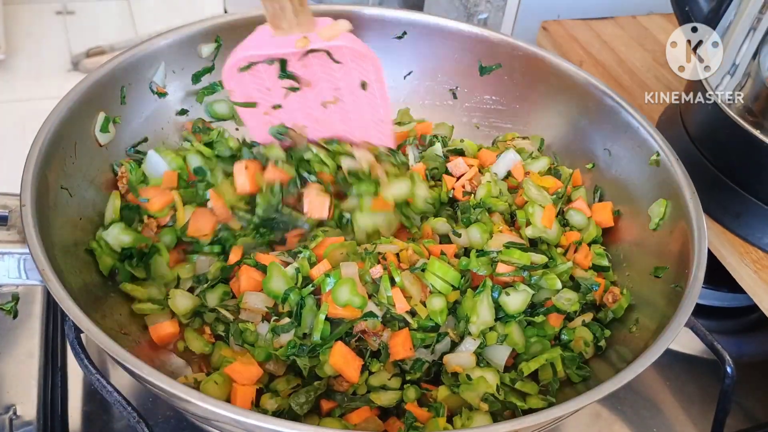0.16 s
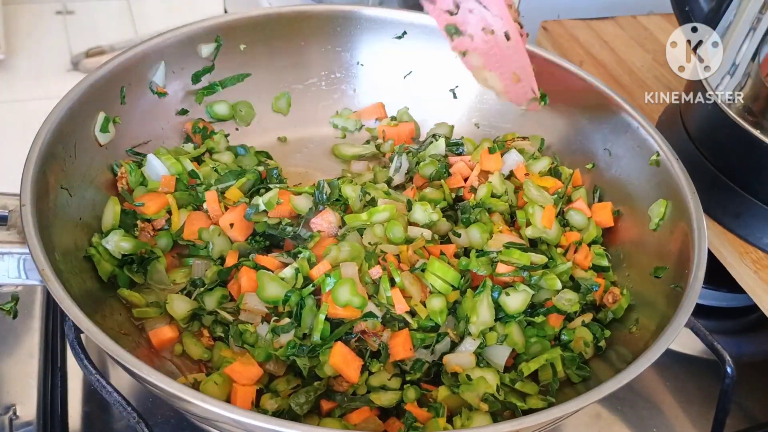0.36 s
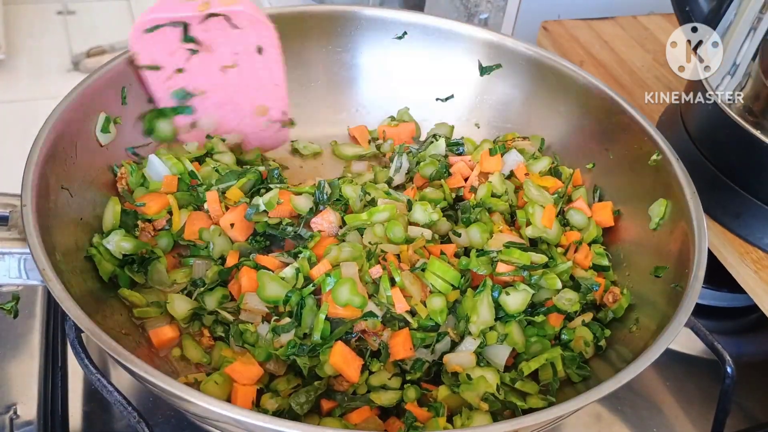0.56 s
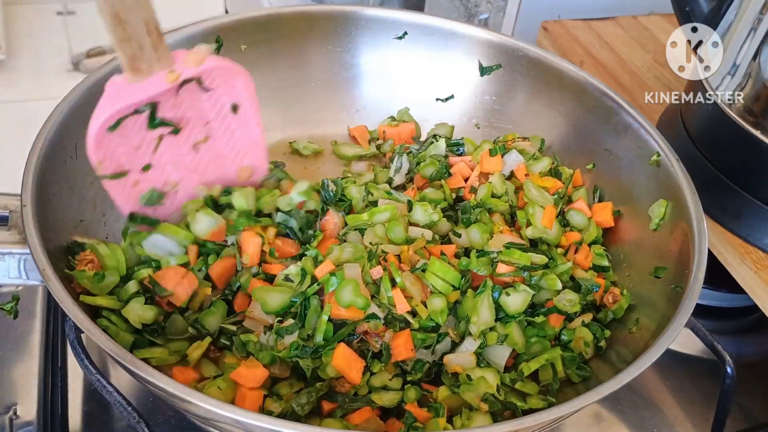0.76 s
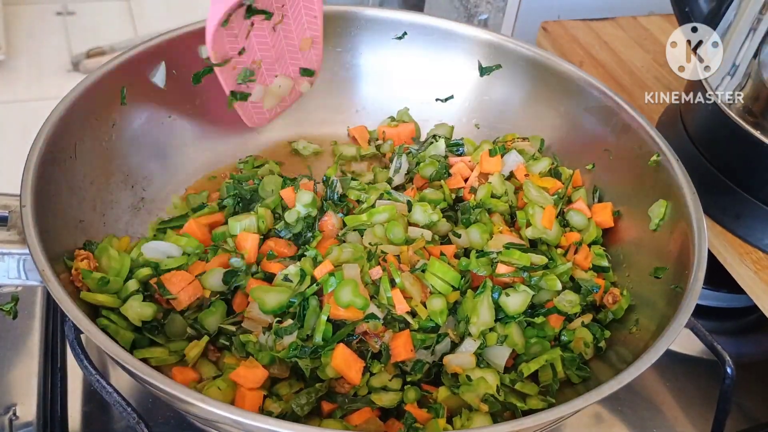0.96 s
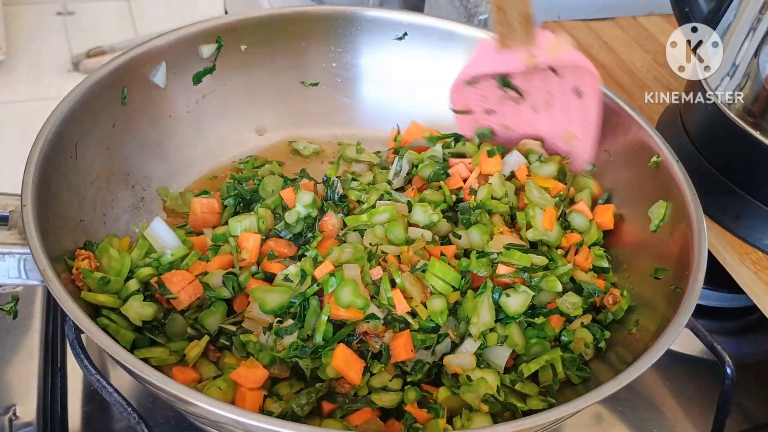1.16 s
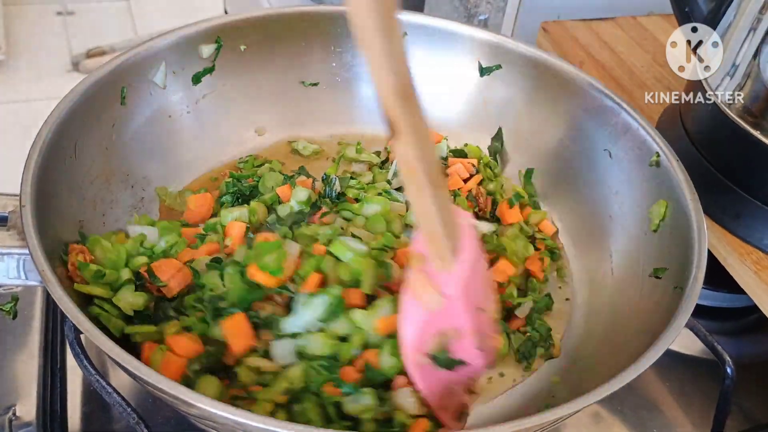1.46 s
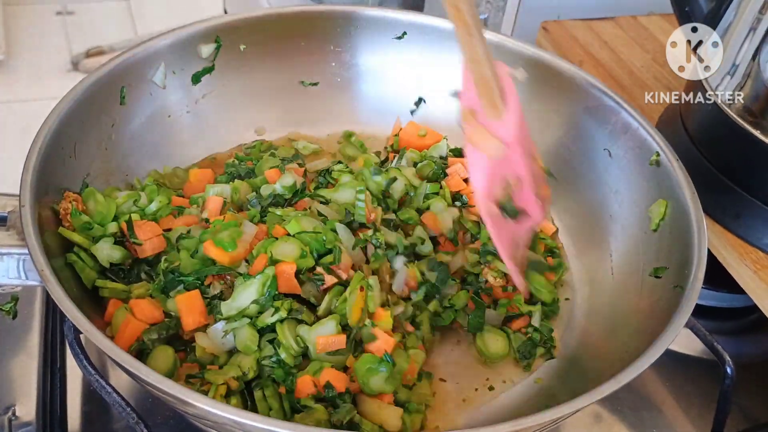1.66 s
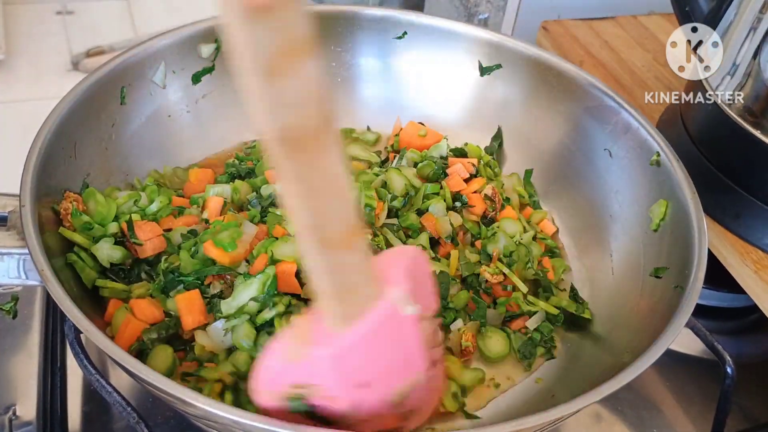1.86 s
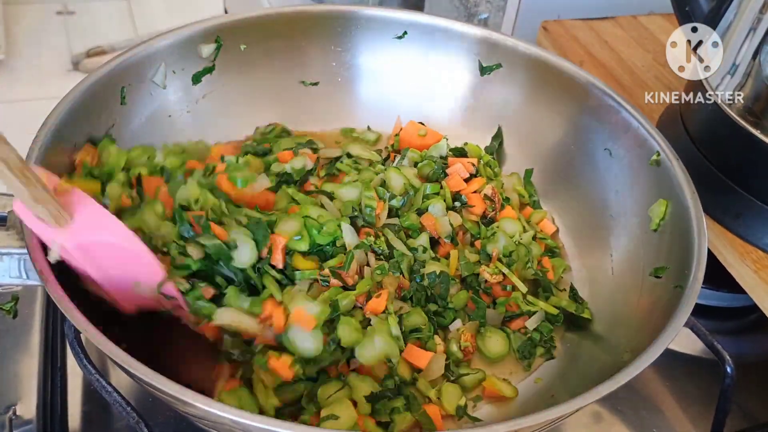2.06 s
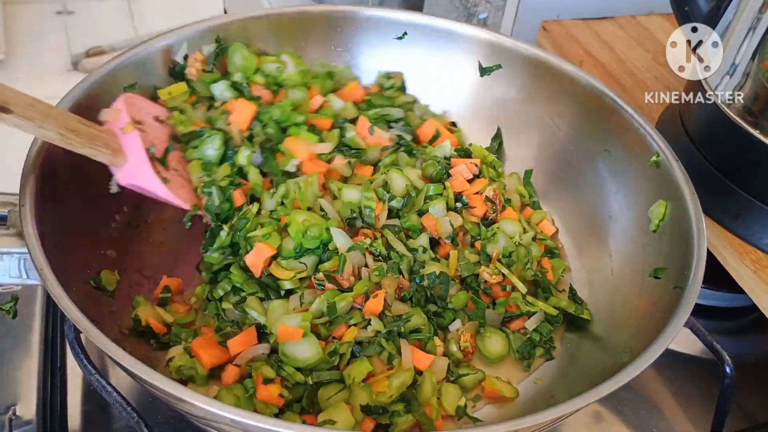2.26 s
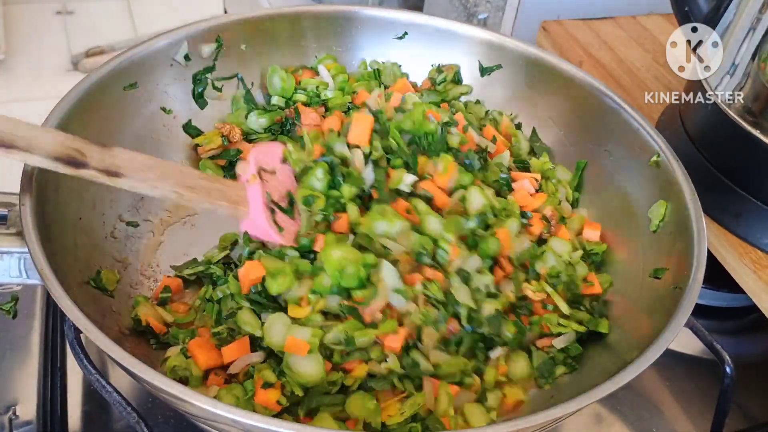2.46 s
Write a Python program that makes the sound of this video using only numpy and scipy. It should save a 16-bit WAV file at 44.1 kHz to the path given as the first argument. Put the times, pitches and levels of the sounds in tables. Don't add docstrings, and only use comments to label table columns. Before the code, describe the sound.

Wet vegetables sizzle and spit in a steel pan, stirred with soft squelches over a low hum

```python
import sys
import numpy as np
from scipy import signal
from scipy.fft import rfft, irfft
from scipy.io import wavfile
from scipy.ndimage import uniform_filter1d

SR = 44100
rng = np.random.default_rng(int(sys.argv[2]) if len(sys.argv) > 2 else 0)


def decibels_to_gain(level_db):
    exponent = np.asarray(level_db, float) / 20
    return 10 ** exponent


def materialize(psi):
    bounded = np.clip(np.atleast_2d(psi).T, -1, 1)
    quanta = np.round(bounded * 32767).astype(np.int16)
    wavfile.write(sys.argv[1], SR, quanta)


N = 114660
FADE_S = 2.306
SPIKE, SPIKE_S = 0.9, 0.0006


def evened(x):
    return x / np.sqrt(np.mean(x ** 2) + 1e-20)


def read(points, hz):
    f, value = np.transpose(points)
    return np.interp(np.log(hz + 1), np.log(f + 1), value)


def curve(table, column):
    rows = np.array(table)
    return np.interp(np.arange(N) / SR, rows[:, 0], rows[:, column])


def colour(x, points):
    log_gain = np.log(decibels_to_gain(read(points, np.abs(np.fft.fftfreq(4096, 1 / SR)))))
    taps = np.fft.ifft(np.exp(np.conj(signal.hilbert(log_gain)))).real[:2048]
    taps = taps / np.linalg.norm(taps)
    return signal.oaconvolve(x, taps[None], axes=1)[:, :N]


def resonate(x, hz, width):
    turn = np.exp(2j * np.pi * np.cumsum(hz * np.ones(x.shape[-1])) / SR)
    r = np.exp(-np.pi * width / SR)
    return 2 * (turn * signal.lfilter([1 - r], [1, -r], x / turn)).real


# pitch in Hz, likeness from 0 to 1.
LIKENESS = [(60, 0.96), (130, 0.85), (300, 0.72), (700, 0.66), (1500, 0.48), (3000, 0.33), (7000, 0.33),
            (15000, 0.25)]
# pitch in Hz, gain in dB.
NEAR_SIDE_TONE = [(300, 0), (3000, -1.35), (9000, 0.1)]


def pair(a, b):
    lag = 10
    hz = np.fft.rfftfreq(N, 1 / SR)
    same = np.clip(read(LIKENESS, hz), 0, 1)
    left = rfft(a) * decibels_to_gain(read(NEAR_SIDE_TONE, hz))
    right = same * rfft(np.roll(a, lag)) + np.sqrt(1 - same ** 2) * rfft(b)
    return np.array([irfft(left, N), irfft(right, N)])


def hiss(patchy_db, flicker_db, size=256):
    framing = dict(nperseg=size, noverlap=size * 3 // 4)
    hz, t, z = signal.stft(pair(*rng.standard_normal((2, N))), **framing)
    patches = uniform_filter1d(rng.standard_normal(z.shape[1:]), size=5, axis=0)
    patches = evened(uniform_filter1d(patches, size=30, axis=1))
    quick = evened(uniform_filter1d(rng.standard_normal(len(t)), size=4))
    slow = evened(uniform_filter1d(rng.standard_normal(len(t)), size=24))
    z = z * decibels_to_gain(patchy_db * patches + flicker_db * (quick + slow))
    return evened(signal.istft(z, **framing)[1][:, :N])


# pitch in Hz, level in dB per Hz.
AIR_COLOUR = [(30, -13), (90, -16), (200, -2.5), (330, -1), (450, -10), (1500, -12), (6000, -13),
              (16000, -52)]


def air():
    late = np.maximum(np.arange(N) / SR - FADE_S, 0)
    return decibels_to_gain(-63 - 2.2 * late) * colour(hiss(patchy_db=1.0, flicker_db=1.9), AIR_COLOUR)


def crackle(per_s, spread_db, t60_s):
    biggest = 2.7
    size = decibels_to_gain(spread_db * np.minimum(rng.exponential(1, N), biggest))
    size = size * (rng.random(N) < per_s / SR)
    kind = rng.integers(0, 14, N)
    t = np.arange(400) / SR
    out = np.zeros((2, N))
    for k, hz in enumerate(np.geomspace(1500, 14000, num=14)):
        noise = rng.standard_normal((2, 400))
        snap = noise + 0.53 * evened(resonate(noise, hz, 0.67 * hz))
        snap = snap * decibels_to_gain(-60 * t / (t60_s * rng.uniform(1.0, 3.4)))
        snap = snap * (1 + SPIKE * np.exp(-t / SPIKE_S))
        out += signal.oaconvolve((size * (kind == k))[None], snap, axes=1)[:, :N]
    return evened(pair(*out))


# time in seconds, boil level in dB, wetness in dB, crackle in dB.
BOIL_COURSE = [(0, -50.5, -13, -1), (.19, -50.5, 2.5, -5), (.228, -25.5, -9, 2.5), (.29, -23.5, -4, -3.5),
               (.41, -29.5, -6.5, -4.5), (.6, -27, -3.5, 3), (.73, -23.5, -10.5, -5),
               (.8, -27.5, -6.5, -9.5), (1.0, -28.5, 3, 1), (1.09, -29.5, -2, -7), (1.24, -22.5, -1, -8.5),
               (1.33, -27, -1, -31), (1.55, -21, -2.5, -19), (1.7, -23, -3, -16), (1.92, -25, 0.5, -10),
               (2.08, -29, 2, -7.5), (2.17, -22.5, -2.5, -6), (2.31, -31, 5, -27)]
# pitch in Hz, level in dB per Hz.
STEAM_COLOUR = [(300, -45.5), (690, -31), (1500, -18), (1900, -8), (2700, -12.5), (6500, 0), (10500, -3.5),
                (16000, -6)]
# pitch in Hz, level in dB per Hz.
JUICE_COLOUR = [(150, -34), (400, -16), (700, -8), (1300, -3), (2500, 7), (4500, 7), (8000, -12),
                (16000, -40.5)]
# middle in seconds, length in seconds, depth in dB.
LEVEL_DIPS = [
    (0.679, 0.041, -11),
    (0.946, 0.048, -5.5),
    (1.033, 0.069, -8.5),
    (1.955, 0.025, -6.5),
]


def boil():
    juice_db, juice_lull = -6, 0.54
    juice_fade_db_per_s = -38
    t = np.arange(N) / SR
    grains = decibels_to_gain(curve(BOIL_COURSE, 3))
    steam = hiss(patchy_db=1.5, flicker_db=0.96)
    steam = steam + grains * crackle(per_s=700, spread_db=3.5, t60_s=0.0042)
    juice = hiss(patchy_db=2.2, flicker_db=0.6)
    juice = juice + 0.5 * crackle(per_s=300, spread_db=2.5, t60_s=0.011)
    lull_db = sum(db * np.exp(-(2 * (t - s) / length) ** 2) for s, length, db in LEVEL_DIPS)
    wet_db = juice_db + juice_lull * lull_db + curve(BOIL_COURSE, 2)
    wet_db = wet_db + juice_fade_db_per_s * np.maximum(t - FADE_S, 0)
    mix = colour(steam, STEAM_COLOUR) + decibels_to_gain(wet_db) * colour(juice, JUICE_COLOUR)
    mix = mix / np.sqrt(1 + grains ** 2)
    return decibels_to_gain(curve(BOIL_COURSE, 1) + lull_db) * mix


# pitch in Hz, width in Hz, level in dB.
BOWL_MODES = [(295, 21, 11), (542.6, 10.5, 9.5), (721, 54, 5.5), (1219, 40, 1.5), (1354, 55, 0.5),
              (1856, 41, 0.5), (2382, 52, 1.5), (4190, 71, -6), (6170, 1400, -5)]


def pan(x):
    ring = sum(decibels_to_gain(db) * resonate(x, hz, width) for hz, width, db in BOWL_MODES)
    return x + decibels_to_gain(-2) * ring


# time in seconds, level in dB, tilt to the upper tone in dB, low pitch in Hz.
DRONE_COURSE = [(0, -53, -3, 59), (.18, -55, 0, 60), (.24, -46, 1, 62), (.42, -52, -4, 60),
                (.52, -53, 5, 60), (.7, -55, 11, 60), (.79, -68, 3, 60), (.91, -52, -3, 60),
                (1.02, -70, 0, 60), (1.1, -55, 4, 60), (1.22, -48, -3, 61), (1.31, -53, 5, 61),
                (1.39, -41, 0, 62), (1.52, -54, 4, 70), (1.88, -55, -5, 75), (2.25, -60, 1, 68),
                (2.44, -56, 10, 62), (2.6, -67, 2, 60)]
# pitch in Hz, width in Hz, level in dB.
UPPER_MODES = [(103, 12.6, -3.5), (72, 26, -12), (165, 14, -11.5)]


def drone():
    low_width_hz, upper_hz = 30, 117.7
    throb_from_s, throb_hz, throb_peak_s, throb = 1.4, 13.4, 2.9, 0.67
    t = np.arange(N) / SR
    noise = pair(*rng.standard_normal((2, N)))
    tilt = decibels_to_gain(curve(DRONE_COURSE, 2))
    low_hz = curve(DRONE_COURSE, 3)

    rumble = resonate(resonate(noise, low_hz, low_width_hz), low_hz, low_width_hz)
    low = decibels_to_gain(-12) * evened(rumble) + decibels_to_gain(-1) * np.sin(2 * np.pi * np.cumsum(low_hz) / SR)
    beat = np.cos(2 * np.pi * throb_hz * (t - throb_peak_s))
    low = low * (1 + throb * (t > throb_from_s) * beat)

    upper = sum(decibels_to_gain(db) * evened(resonate(resonate(noise, hz, width), hz, 2 * width))
                for hz, width, db in UPPER_MODES)
    ear_phase = np.array([[0], [0.4]])
    upper = upper + decibels_to_gain(-1) * np.sin(2 * np.pi * upper_hz * t + ear_phase)
    return decibels_to_gain(curve(DRONE_COURSE, 1) - 2) * (low / tilt + upper * tilt)


# start in seconds, peak in dB, pitch in Hz, time to die by 60 dB in seconds,
# wide hiss in dB.
SPIT_DROPS = [(0.147, -42, 6090, 0.019, 0), (0.194, -26, 8890, 0.01, 1.5), (0.21, -14.5, 6000, 0.023, -1),
              (0.232, -12.5, 7600, 0.016, -10), (0.252, -17, 4150, 0.012, -9),
              (0.2769, -6, 7100, 0.014, -2.5), (0.3407, -11, 6700, 0.01, -17), (0.436, -10, 6700, 0.022, 0),
              (0.449, -9, 6600, 0.02, -5), (0.502, -33, 13100, 0.01, -1), (0.518, -27, 6830, 0.012, -5),
              (0.528, -7.5, 8750, 0.028, 1.5), (0.5628, -6, 8760, 0.014, 1.5),
              (0.578, -9.5, 6760, 0.02, -4), (0.614, -13, 8100, 0.0086, -1), (0.633, -12, 5000, 0.012, 8),
              (0.649, -15, 6500, 0.0074, -4), (0.7314, -21, 4160, 0.015, 10),
              (0.9665, -20, 4100, 0.0095, -3), (1.0133, -26, 5000, 0.016, -6),
              (1.0247, -8.5, 7500, 0.0092, 5), (1.0354, -12, 7500, 0.0071, 7),
              (1.0981, -23, 7310, 0.0086, -3), (1.1762, -10, 6090, 0.0073, -8),
              (1.1948, -15, 4170, 0.013, -9), (1.2544, -8.5, 6040, 0.025, -13),
              (1.6338, -8, 5660, 0.014, 8), (1.732, -14, 5000, 0.012, 2), (1.96, -9, 7000, 0.0084, 6),
              (2.0252, -3.5, 3200, 0.015, -16), (2.1802, -10, 4470, 0.012, -4),
              (2.1917, -4.5, 4000, 0.02, -2), (2.1962, -11, 9000, 0.0067, 1.5),
              (2.2995, -15.5, 5500, 0.01, -6), (2.35, -25, 5500, 0.0092, -1), (2.362, -26, 8000, 0.0091, 4),
              (2.4036, -25.5, 9050, 0.02, 2.5), (2.4597, -29, 11000, 0.011, 11),
              (2.4914, -29, 8400, 0.011, 7.5), (2.5524, -37.5, 5500, 0.015, -8)]


def spits():
    width, rise_s = 0.4, 0.0003
    t = np.arange(3000) / SR
    out = np.zeros((2, N + 3000))
    for s, peak_db, hz, t60, wide_db in SPIT_DROPS:
        noise = rng.standard_normal((2, 3000))
        snap = evened(resonate(resonate(noise, hz, width * hz), hz, 3.9 * hz))
        snap = snap + decibels_to_gain(wide_db) * noise
        snap = snap * decibels_to_gain(-60 * t / t60) * np.minimum(t / rise_s, 1)
        snap = snap * (1 + SPIKE * np.exp(-t / SPIKE_S))
        start = round(s * SR)
        out[:, start:start + 3000] += decibels_to_gain(peak_db) * snap / abs(snap).max(axis=1, keepdims=True)
    return colour(pair(*out[:, :N]), [(300, -42), (900, -20), (2500, -7), (9000, -5), (16000, -6)])


# start in seconds, end in seconds.
PUSH_TIMES = [(.725, .775), (1.008, 1.028), (1.24, 1.27), (1.47, 1.62), (1.49, 1.7), (1.62, 1.69),
              (2.03, 2.048), (2.02, 2.06), (2.18, 2.25), (2.29, 2.37), (2.24, 2.46)]
# level in dB, pitch in Hz.
PUSH_SOUNDS = [(-38.5, 3100), (-33, 7200), (-40, 4400), (-37, 1500), (-55, 417), (-29, 5100), (-28, 5100),
               (-52, 720), (-35, 4600), (-58, 240), (-49, 6300)]
# pitch in Hz, level in dB per Hz.
SQUELCH_COLOUR = [(150, -40), (300, -36), (600, -9), (1300, -3.5), (3500, 7), (6000, -1), (10000, -14),
                  (16000, -14)]


def stirs():
    t = np.arange(N) / SR
    out = np.zeros((2, N))
    rub = hiss(patchy_db=4.0, flicker_db=-1.1)
    rub = rub + 0.43 * crackle(per_s=1400, spread_db=1.0, t60_s=0.0052)
    wide = decibels_to_gain(1.5) * colour(rub, SQUELCH_COLOUR)
    for (start, end), (db, hz) in zip(PUSH_TIMES, PUSH_SOUNDS):
        part = slice(round(start * SR), round(end * SR))
        edge_s = 0.0032 + 0.13 * (end - start)
        push = np.clip(np.minimum((t[part] - start) * 3, end - t[part]) / edge_s, 0, 1)
        tone = evened(resonate(resonate(rub[:, part], hz, 0.29 * hz), hz, hz))
        out[:, part] += decibels_to_gain(db) * push * (tone + wide[:, part])
    return out


def scene():
    late = np.maximum(np.arange(N) / SR - FADE_S, 0)
    fade_db = -78 * late - 2.5 * np.minimum(late / 0.036, 1)
    fade_db = fade_db - 3.5 * np.clip((late + FADE_S - 2.5) / 0.024, 0, 1)
    kitchen = air()
    kitchen = kitchen + pan(boil() * decibels_to_gain(fade_db) + stirs() + spits())
    near_left = decibels_to_gain([[0.59], [-0.59]])
    drone_right = decibels_to_gain([[-1.2], [1.2]])
    return kitchen * near_left + drone() * drone_right


def roll_off(x):
    return signal.sosfilt(signal.butter(12, 16800, fs=SR, output="sos"), x)


def record(dry):
    low_pass = signal.firwin(511, 15650, window=("kaiser", 9), fs=SR)
    limited = signal.oaconvolve(dry, low_pass[None], "same")
    return roll_off(limited)


dry = scene()
out = record(dry)
materialize(out)
```